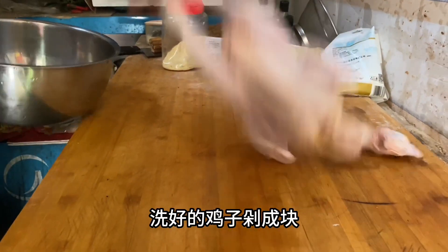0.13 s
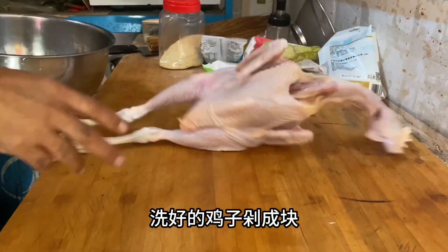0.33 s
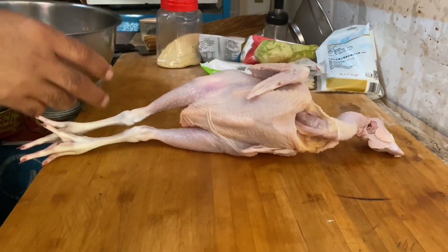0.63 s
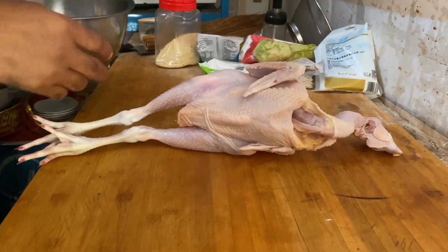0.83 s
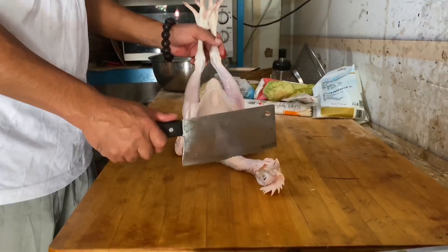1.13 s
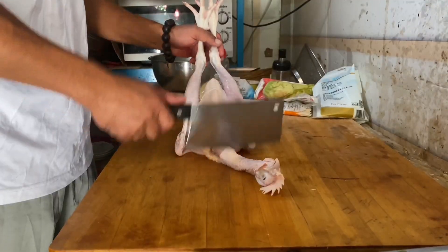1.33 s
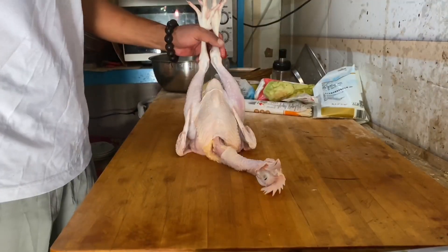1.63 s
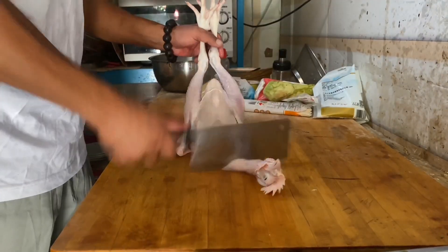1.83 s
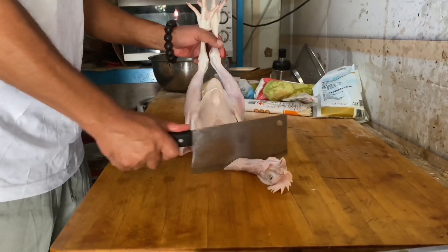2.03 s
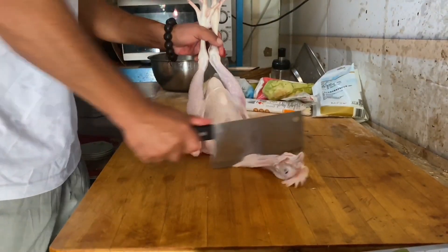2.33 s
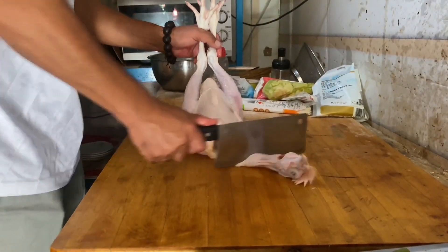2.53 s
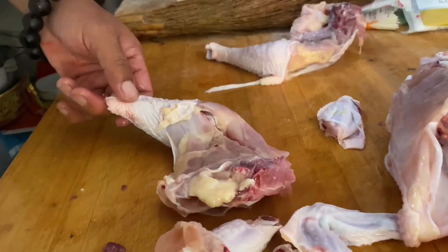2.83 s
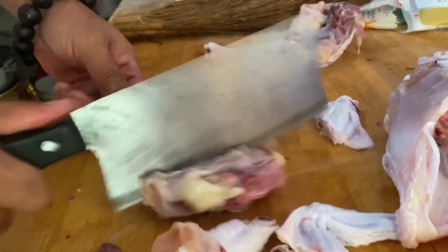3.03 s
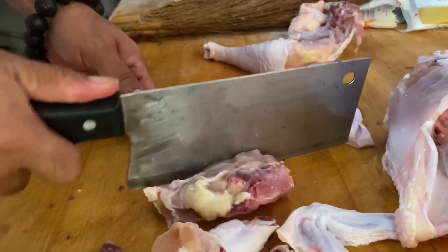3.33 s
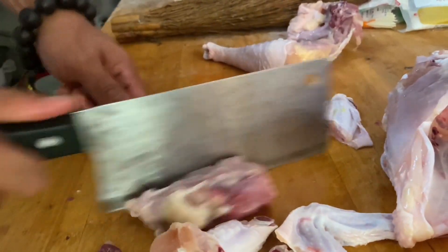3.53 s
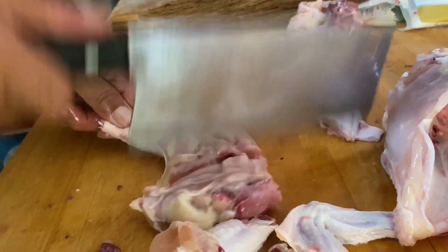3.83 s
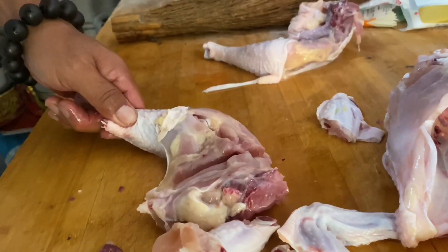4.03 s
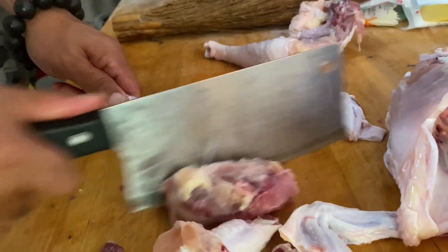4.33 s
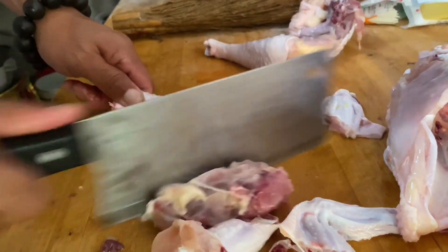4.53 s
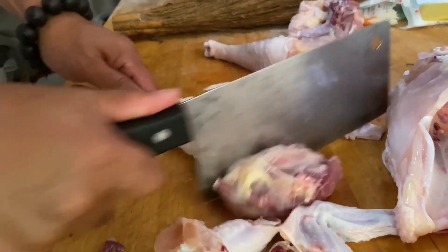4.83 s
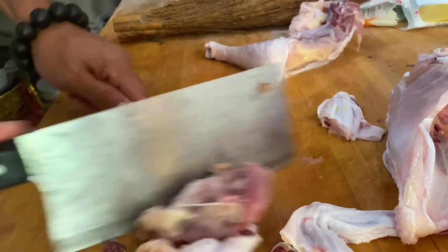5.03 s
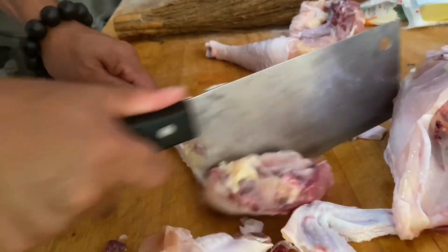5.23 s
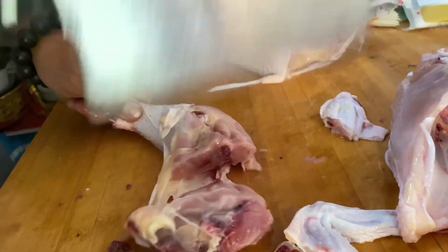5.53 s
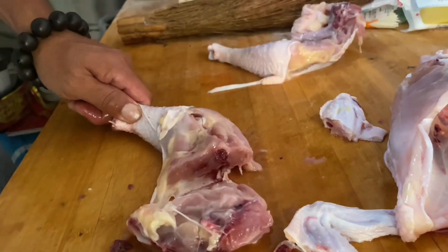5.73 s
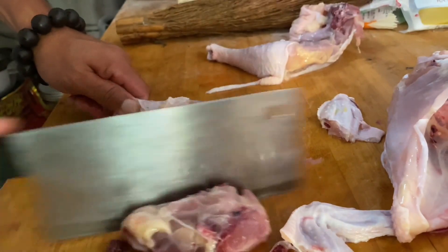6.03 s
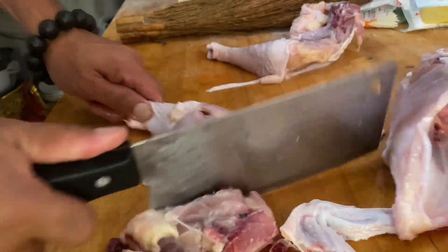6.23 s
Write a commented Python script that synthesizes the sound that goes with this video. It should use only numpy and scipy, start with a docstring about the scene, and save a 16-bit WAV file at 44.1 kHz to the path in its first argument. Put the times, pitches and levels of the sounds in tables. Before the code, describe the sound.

Close stereo pickup of butchering on a wooden board: a tumbling, fleshy landing with a short metallic bowl ring, then low kitchen hum. One hard chop with light steel rattle and a short echo, then bumps as the meat is pushed. The room noise suddenly cuts to near quiet, and three solid, crunchy chops follow at wide intervals, with tiny taps and scrapes between.

```python
"""Chopping a chicken on a board

A plucked chicken drops on a thick wooden board; a cleaver chops it and is dragged through the meat, amid light knocks.
Blows and bumps excite decaying modes of wood; bone, gristle and wet skin are shaped noise; steel rings and rattles.
A hard-walled kitchen adds a noise-tap echo, hum and hiss, and a steel bowl rings at the start.
At 2.612 s a loud kitchen background cuts to a quieter one, echo tail included.
Two microphone ports, the board nearer the left one."""
import sys
import numpy as np
from scipy import signal
from scipy.fft import rfft, irfft, next_fast_len
from scipy.io import wavfile
from scipy.ndimage import uniform_filter1d

SR = 44100
rng = np.random.default_rng(int(sys.argv[2]) if len(sys.argv) > 2 else 0)


def dump_mix(stems):
    """Bounce the given channels to the path in sys.argv[1] as a 16-bit WAV at rate SR."""
    frames = np.atleast_2d(stems).T  # one column per channel
    limited = np.clip(frames, -1, 1)  # hard clip at full scale
    pcm = np.round(limited * 32767).astype(np.int16)
    wavfile.write(sys.argv[1], SR, pcm)


N = 281313

# Levels are relative within each source.
# Board modes before damping: [mode_hz, level_db, t60_s]
BOARD_MODES = [(68.4, -7, 0.038), (96, -6, 0.079), (129.86, -12, 0.34), (167, -9.5, 0.14),
               (263, -4.5, 0.056), (361, -3.5, 0.037), (533, 0.5, 0.016), (623, 2.5, 0.086),
               (840, 13, 0.043), (919.5, 13.5, 0.033), (1052, -1.5, 0.23), (1290, 1, 0.024),
               (1730, -11.5, 0.0085), (2310, -18, 0.049)]
# Ringing steel of blade and pans: [mode_hz, level_db, t60_s]
BLADE_MODES = [(769, -10, 0.5), (910, -4, 0.3), (1013, -15.5, .6), (1270, -14.5, 0.18), (1530, -9.5, 0.3),
               (1685, -22, 0.45), (1972, -18, 0.27), (2204, -23, 0.52), (2490, -22, 0.19),
               (2824, -25.5, 0.13), (3110, -21, 0.28), (3200, -30.5, .3), (3670, -26.5, .3),
               (4230, -31.5, .25)]
# Spectrum of cracking bone, skin and steel: [freq_hz, level_db]
CRACK_SPECTRUM = [(250, -6), (1000, 15), (2000, -1), (3600, -3), (6200, -9), (8300, -20), (10300, -6.5),
                  (13000, -24.5), (16000, -26)]
# Parts of the carcass landing on the board:
# [start_s, strength_db, weight_db, table_db, crack_db, contact_ms, thud_db, thud_hz]
SLAPS = [(0.098, -9.5, -12.5, -15.5, -21, 0.59, -17, 807), (.101, -25, -25, -32, -34, 1.2, -13, 248),
         (.112, -12, -21, -22.5, -11, 0.52, -4.5, 267), (0.127, -15, 1.5, -5.5, -18.5, 1.8, -11.5, 164),
         (0.183, 4, -31, -8, -10.5, 0.5, -15, 553), (0.197, -31.5, -1, -25, -43, 1.2, -5, 251.4),
         (.349, -13, -8, -24.5, -37.5, 1.4, -17, 283)]
# Cleaver chops: [start_s, strength_db, weight_db, table_db, crack_db, blade_db, contact_ms, follow_ms, cut_ms,
# thud_db, thud_hz, thud_lag_ms, knock_db, knock_hz, pans_db]
CHOPS = [(1.780, -2.5, -11, -7.5, -6, -30, 0.31, 4.7, 9.4, -9.5, 400, .5, -8.5, 1146, -52.5),
         (2.9683, -0.5, -3, -6, -15.5, -25, 0.36, 2.9, 2.8, -7.5, 356, 1, -7, 788, -49),
         (4.048, 1, -2.5, -5, -13, -43, 0.3, 3.3, 5.6, -6.5, 348, 1.51, -13.5, 870, -62),
         (5.7438, 2, -19.5, -21.5, -14.5, -28.5, 0.48, 1.8, 5.5, -4, 366, 2.87, 4, 972, -47.5)]
# Light short knocks: [start_s, strength_db, weight_db, thud_db, thud_reference_hz]
TAPS = [(2.959, -18.5, -46, -28.5, 508), (3.703, -22.5, -33.5, -30, 540.5), (3.762, -52, -47.5, -52.5, 398),
        (4.621, -44, -44.5, -37.5, 412), (4.698, -37.5, -40, -42.5, 466), (5.377, -23.5, -34.5, -29, 524.6),
        (5.737, -12, -54, -26.5, 893), (6.216, -43, -39, -37.5, 458), (6.249, -24.5, -51.5, -50, 374.6),
        (6.353, -26, -23.5, -37, 960)]
# Softer repeats of each light knock: [delay_ms, level_db, share_of_thud_reference]
TAP_BOUNCES = [(11.9, -10, 0.54), (28.35, -13.5, 0.56)]
# Tiled wall behind the board: [delay_ms, level_db]
WALL_ECHOES = [(4.3, -4), (13.5, -11)]
# Pans and jars too many to tell apart: [freq_hz, density_db_per_hz]
CLATTER_SPECTRUM = [(300, -11.5), (800, 2), (1700, -4.5), (3200, -8), (5000, -14.5), (9000, -24.5)]
# Ticks of wet skin, gristle and steel: [start_s, level_db, pitch_hz, filter_q, t60_s]
TICKS = [(0.046, -32, 3720, 3.6, 0.2), (1.778, -23.5, 5520, 31, 0.036), (2.969, -20, 3970, 4.6, 0.0092),
         (4.053, -17, 2360, 4.3, 0.017), (4.672, -49.5, 3640, 4.5, 0.056), (5.751, -28, 1880, 1.2, 0.16),
         (6.338, -55, 4530, 9.1, 0.038), (6.356, -47.5, 3770, 7.5, 0.21), (.13, -25, 2560, 2.8, 0.052),
         (0.657, -47, 1800, 3.3, 0.042), (0.675, -41.5, 1650, 2.7, 0.1), (.28, -31.5, 3380, 7.6, 0.039),
         (0.311, -36, 4060, 7.1, 0.017), (2.326, -46.5, 1710, 3.6, 0.088), (2.191, -59.5, 4500, 5, 0.086),
         (2.365, -56, 3600, 8, .03), (2.387, -57.5, 3020, 4.2, 0.038), (3.76, -84, 4790, 180, 0.37),
         (3.76, -63.5, 5980, 1.1, 0.0097), (4.474, -60, 3400, 4.7, 0.078), (4.622, -59.5, 4020, 2, 0.13),
         (4.68, -54, 1930, 3.5, 0.096), (4.878, -56.5, 4180, 1.9, 0.015), (4.887, -58, 3970, 2.6, 0.017),
         (5.04, -52.5, 4150, 1.56, 0.017), (5.333, -50.5, 3740, 2.15, 0.022), (6.264, -43, 4060, 3.3, 0.12)]
# Meat and blade moving over the board: [peak_s, rise_s, fall_s, table_db, weight_db, scrape_db, hiss_db]
STROKES = [(0.014, 0.11, 0.28, -51.5, -34, -29.5, -40), (0.115, 0.018, 0.02, -18, -18.5, -17, -19),
           (0.149, 0.058, 0.087, -20.5, -17.5, -19.5, -27), (.19, 0.044, 0.14, -16, -23.5, -29.5, -36.5),
           (0.356, 0.018, 0.11, -21, -28.5, -53, -48), (0.668, 0.03, 0.081, -55, -59, -50, -51),
           (2.051, 0.24, 0.13, -46, -48.5, -46, -81), (2.119, 0.091, 0.048, -58, -67, -42.5, -58.5),
           (2.163, 0.059, 0.15, -32, -51, -48, -56), (2.319, 0.067, 0.1, -37.5, -47, -52.5, -72),
           (2.483, 0.32, 0.31, -46, -55.5, -58, -74), (3.54, 0.13, 0.023, -55, -58.5, -59.5, -70.5),
           (4.23, 0.05, 0.56, -54.5, -70, -64.5, -73.5), (4.419, 0.024, 0.063, -79, -51, -55, -70),
           (4.484, 0.06, 0.057, -69, -52, -56.5, -72), (4.667, 0.085, 0.054, -47, -69.5, -46.5, -58.5),
           (4.74, 0.12, 0.16, -53.5, -58.5, -75.5, -100), (4.89, 0.18, 0.063, -67.5, -72.5, -85, -75),
           (5.023, 0.06, 0.2, -57.5, -62.5, -63, -70), (5.199, 0.042, 0.05, -65, -56.5, -68, -69),
           (5.274, 0.15, 0.083, -59, -73.5, -70, -72), (5.858, 0.054, 0.96, -43.5, -49, -51.5, -77),
           (6.0, 0.07, 0.11, -55.5, -54, -51, -56.5), (6.226, 0.038, 0.27, -52, -52, -71, -70.5),
           (6.266, 0.0052, 0.044, -42, -48, -41.5, -45), (6.362, 0.028, 0.12, -32.5, -40, -39, -52.5)]
# Wet skin hiss: [freq_hz, density_db_per_hz]
WET_SPECTRUM = [(760, -49.5), (1300, 0), (1800, -4), (2600, -14), (3400, -4), (4580, -8), (8430, -18),
                (10400, -13), (13400, -24.5), (15300, -29), (16000, -79)]
# Carcass bumping the board as it is pushed: [start_s, level_db, pitch_hz, t60_s]
BUMPS = [(2.146, -22, 124, 0.11), (2.183, -29, 131, 0.16), (2.227, -33.5, 132, 0.15), (2.316, -38, 204, .1),
         (2.474, -42, 137.4, 0.091), (3.792, -54, 150, .05), (5.018, -47, 129.5, 0.1),
         (5.057, -46.5, 134.5, 0.32), (5.19, -47.5, 131.4, 0.34), (5.263, -52, 122, 0.18),
         (5.968, -50, 295, 0.087)]
# Pans on the shelves, before the closing fade: [mode_hz, level_db, t60_s]
PAN_MODES = [(750, -4, 1.9), (880, 0.5, .55), (1010, -4.5, 5), (1355, -12, .5), (1450, -10, 2),
             (1725, -5.5, 1.2), (2030, -9.5, 1), (2260, -13, .7), (2490, -12, .6), (2772, -16.5, .45),
             (3070, -11, 0.72), (3187, -10.5, 0.54)]
# Steel bowl: [mode_hz, level_db, t60_s]
BOWL_MODES = [(371, -14, .15), (560, -10, .06), (791, -8, .25), (894, -5, .07), (1020, 1, .06),
              (1580, -8, .06), (1690, -6, .06), (1960, -18, .2), (2100, -20, .15)]
# Table swaying after heavy blows and pushes: [peak_s, level_db, pitch_hz, rise_s, t60_s]
SWAYS = [(0.141, -8, 57.2, 0.037, 0.35), (1.798, -38.5, 75.5, 0.009, 0.24), (2.005, -46, 59.2, 0.11, 0.38),
         (2.198, -44, 75.7, 0.083, 0.23), (3.111, -35.5, 57.9, .13, 0.53), (4.155, -34, 60.5, 0.13, 0.25),
         (4.801, -57.5, 63.8, 0.073, 1.2), (5.269, -54.5, 72, 0.095, 0.44), (5.867, -31, 49.4, 0.14, 0.58),
         (6.287, -43.5, 66.6, 0.19, 0.84)]
# Kitchen air level: [time_s, level_db]
AIR_LEVEL = [(0, -39), (.8, -52.5), (2.608, -58), (2.616, -73.5), (6.38, -72)]
# Louder kitchen air, before the cut: [freq_hz, density_db_per_hz]
AIR_LOUD_SPECTRUM = [(59, -11.5), (100, 4), (169, 2), (317, -16), (367, -8), (513, -24.5), (867, -24),
                     (1290, -38.5), (1730, -38.5), (2690, -49.5), (3680, -38), (5720, -34.5), (7050, -42.5),
                     (8700, -58.5), (15000, -72)]
# Quieter kitchen air, after the cut: [freq_hz, density_db_per_hz]
AIR_QUIET_SPECTRUM = [(59, -15), (100, 8.5), (146, 2.5), (297, -14.5), (345, -11), (472, -16.5),
                      (570, -30.5), (797, -21.5), (1240, -36), (2320, -42.5), (4840, -39.5), (6090, -43),
                      (8500, -50), (15000, -55.5)]
# Room decay: [freq_hz, t60_s]
ROOM_DECAY = [(100, 1), (300, 0.75), (900, 0.37), (2000, 0.41), (4000, 0.33), (8000, 0.36), (14000, 0.02)]
# Left port over right port: [freq_hz, difference_db]
LEFT_OVER_RIGHT = [(60, -1), (200, -2.3), (400, -1), (750, 3), (1400, 1.5), (2600, 5), (5000, 9.5),
                   (9000, 0), (15000, -.5)]
# Part of diffuse sound that differs between the ports: [freq_hz, level_db]
PORTS_APART = [(60, -32.5), (300, -7), (700, 0.5)]
# Microphone colour: [freq_hz, level_db]
MICROPHONE_COLOUR = [(11500, 2), (13500, -10)]

CUT_S = 2.612  # loud background cuts to the quieter one
RIGHT_LAG_SAMPLES = 18
# the board bends, then the table shakes, after the wood is reached
BOARD_LAG_MS, TABLE_LAG_MS = 4.5, 7
# flesh or steel left on the wood stills its high modes
SLAP_DAMP_T60_S, CHOP_DAMP_T60_S, TAP_DAMP_T60_S = 0.35, 0.36, 0.036
# board sound carried to the walls
SLAP_WALLS_DB, CHOP_WALLS_DB, TAP_WALLS_DB = -1, 2.5, -3
SLAP_FOLLOW_MS, SLAP_SQUASH_MS = 5.7, 2.6  # squash: flesh gives before the wood takes the weight
TAP_CONTACT_MS, TAP_FOLLOW_MS, TAP_LEAD_MS = 1.25, 2, 0.28
TAP_TABLE_DB, TAP_CRACK_DB = -7, -32  # table relative to weight; crack relative to strength
TAP_FIRST_SHARE = 0.92  # of thud_reference_hz
SLAP_THUD_T60_S, CHOP_THUD_T60_S, TAP_THUD_T60_S, THUD_LAG_MS = .08, .03, .022, 1.3
CLATTER_DB, CLATTER_T60_S = -12, 0.56  # relative to the blade ring
WOBBLE_PER_S = 140
STROKE_ENDS_DB, STROKE_ROUND = -21, 1.1  # level one rise or fall from the peak; 1 = pointed, higher = flatter
SING_DB = -6  # steel ringing along while dragged
BUMP_CONTACT_MS = 3
PANS_RISE_S = .02
KNOCK_T60_S, KNOCK_RISE_MS = .035, 3
HUM_HZ, HUM_LOUD_DB, HUM_QUIET_DB = 69, -45, -72
SWAY_START_DB = -28  # one rise before the peak
EDGE_HZ = 16700


def blows():
    """Crunch through bone, snap on wood, then weight in the low modes; rows: left, right, towards the walls."""
    out = np.zeros((3, N))
    high, low, table = ring(BOARD_MODES, 400), ring(BOARD_MODES, 150, 400), ring(BOARD_MODES, 0, 150)
    high = high + sum(gain_of(db) * np.roll(high, round(ms * SR / 1000)) for ms, db in WALL_ECHOES)
    high, low, table = (x / abs(x).max() for x in (high, low, table))
    low = np.roll(low, round(BOARD_LAG_MS * SR / 1000))
    table = np.roll(table, round(TABLE_LAG_MS * SR / 1000))
    snap = coloured(1. * (np.arange(256) == 128), CRACK_SPECTRUM)
    snap /= abs(snap).max()
    for (s, strength_db, weight_db, table_db, crack_db, blade_db, contact_ms, follow_ms, cut_ms,
         thud_db, thud_hz, thud_t60_s, lag_ms, damp_t60_s, walls_db) in contacts():
        wood_s = cut_ms / 1000
        crunch = crack_noise(crack_db, wood_s)
        heavy = gain_of(weight_db) * low + gain_of(table_db) * table
        damping = gain_of(strength_db - 60 * np.arange(SR) / SR / damp_t60_s)
        body = damping * pushed(high, contact_ms)[:SR] + pushed(heavy, follow_ms)[:SR]
        thud = ring([(thud_hz, thud_db, thud_t60_s)])[:5292]
        add(body, lag_ms / 1000, pushed(thud, 0.75))
        for snap_db, body_db, port in zip((8, 8, 16), (0, 0, walls_db), out):
            add(port, s + wood_s - 128 / SR, gain_of(crack_db + snap_db) * snap)
            add(port, s + wood_s, gain_of(body_db) * body)
        add(out[0], s, crunch[0])
        add(out[1], s, 0.022 * crunch[0] + crunch[1])
        if blade_db is not None:  # thin steel is heard mostly off the walls
            steel = rattle(BLADE_MODES, steady=.35) + clatter()
            add(out[2], s + wood_s, gain_of(blade_db) * steel)
    return out


def crack_noise(crack_db, wood_s):
    """Splinter noise, different at each port, grows until the wood is reached and then dies fast."""
    t = np.arange(1323) / SR
    crunch = evened(coloured(rng.standard_normal((2, len(t))), CRACK_SPECTRUM))
    crunch *= gain_of(crack_db - 22 * np.maximum(1 - t / wood_s, 0))
    return crunch * gain_of(-60 * np.maximum(t - wood_s, 0) / .012)


def contacts():
    """Gathers slaps, chops and light knocks with their repeats as rows in the order that blows() unpacks."""
    rows = []
    for s, strength, weight, table, crack, contact, thud_db, thud_hz in SLAPS:
        rows.append((s, strength, weight, table, crack, None, contact, SLAP_FOLLOW_MS, SLAP_SQUASH_MS,
                     thud_db, thud_hz, SLAP_THUD_T60_S, THUD_LAG_MS, SLAP_DAMP_T60_S, SLAP_WALLS_DB))
    for *row, lag_ms, _, _, _ in CHOPS:
        rows.append((*row, CHOP_THUD_T60_S, lag_ms, CHOP_DAMP_T60_S, CHOP_WALLS_DB))
    for s, strength, weight, thud_db, thud_hz in TAPS:
        for delay_ms, less_db, share in [(0, 0, TAP_FIRST_SHARE)] + list(TAP_BOUNCES):
            hit_db, press_db = strength + less_db, weight + less_db
            rows.append((s + delay_ms / 1000, hit_db, press_db, press_db + TAP_TABLE_DB, hit_db + TAP_CRACK_DB,
                         None, TAP_CONTACT_MS, TAP_FOLLOW_MS, TAP_LEAD_MS, thud_db + less_db, thud_hz * share,
                         TAP_THUD_T60_S, THUD_LAG_MS, TAP_DAMP_T60_S, TAP_WALLS_DB))
    return rows


def rattle(modes, steady):
    """Loose steel: each mode wanders in strength and phase while it dies, which blurs its line."""
    hz, db, t60 = np.transpose(modes)[:, :, None]
    t, knots_s = np.arange(SR * 3 // 4) / SR, np.arange(120) / WOBBLE_PER_S
    walks = rng.standard_normal((2, len(modes), len(knots_s)))
    a, b = (np.array([np.interp(t, knots_s, row) for row in part]) for part in walks)
    phase = 2 * np.pi * hz * t
    return (gain_of(db - 60 * t / t60) * ((steady + a) * np.sin(phase) + b * np.cos(phase))).sum(0)


def clatter():
    """The shelves answer a chop with a dense dying rattle of shaped noise."""
    t = np.arange(SR * 3 // 4) / SR
    noise = evened(coloured(rng.standard_normal(len(t)), CLATTER_SPECTRUM))
    return gain_of(CLATTER_DB - 60 * t / CLATTER_T60_S) * noise


def ticks():
    """Each tick is a decaying puff of noise, resonant around its pitch."""
    out, t = np.zeros(N), np.arange(6000) / SR
    for s, db, hz, q, t60 in TICKS:
        peak = signal.iirpeak(hz, q, SR)
        puff = signal.lfilter(*peak, signal.lfilter(*peak, rng.standard_normal(len(t))))
        add(out, s, gain_of(db - 60 * t / t60) * evened(puff))
    return out


def rubs():
    """Stick-slip grains drive the table and the low and middle board modes; wet skin hisses above them."""
    t, power = np.arange(N) / SR, np.zeros((4, N))
    for s, rise, fall, *dbs in STROKES:
        end_s = min(s + 2 * fall, CUT_S if s < CUT_S else N)
        near = slice(max(round((s - 2 * rise) * SR), 0), round(end_s * SR))
        off = abs(t[near] - s) / np.where(t[near] < s, rise, fall)
        power[:, near] += gain_of(np.array(dbs)[:, None] + STROKE_ENDS_DB * off ** STROKE_ROUND) ** 2
    bursts_db = np.minimum(rng.exponential(1, (4, N)), 5) * [[3.5], [3.5], [3.1], [2.5]]
    slips = rng.standard_normal((4, N)) * gain_of(bursts_db)
    # wet skin grips and lets go in clumps
    slips[2:] *= gain_of(1.6 * evened(uniform_filter1d(rng.standard_normal(N), 220)))
    bands_hz = [(80, 200), (200, 400), (400, 1500)]
    wood = [signal.oaconvolve(slip, ring(BOARD_MODES, *band))[:N] for slip, band in zip(slips, bands_hz)]
    singing = evened(signal.oaconvolve(slips[2], ring(BLADE_MODES))[:N])
    wood[2] = evened(wood[2]) + gain_of(SING_DB) * singing
    return sum(np.sqrt(p) * evened(x) for p, x in zip(power, wood + [squelch(slips[3])]))


def squelch(grains):
    """Wet skin: patches a few hundred Hz wide swell and close on their own."""
    z = signal.stft(coloured(grains, WET_SPECTRUM), nperseg=128)[2]
    patches = uniform_filter1d(rng.standard_normal(z.shape), 3, axis=0)
    patches = evened(uniform_filter1d(patches, 8, axis=1))
    return signal.istft(z * gain_of(4.1 * patches), nperseg=128)[1][:N]


def bumps():
    """Each bump is one soft low ring of the board."""
    out = np.zeros(N)
    for s, db, hz, t60 in BUMPS:
        add(out, s, pushed(ring([(hz, db, t60)]), BUMP_CONTACT_MS))
    return out


def pans():
    """Clear thin lines swell in after each chop; a short bone knock rings up as the edge bites."""
    out, t = np.zeros(N), np.arange(SR) / SR
    lines = ring(PAN_MODES) * np.minimum(t / PANS_RISE_S, 1) * np.hanning(2 * SR)[SR:]
    for s, *_, cut_ms, thud_db, thud_hz, lag_ms, knock_db, knock_hz, pans_db in CHOPS:
        add(out, s + cut_ms / 1000, gain_of(pans_db) * lines)
        knock = ring([(knock_hz, knock_db, KNOCK_T60_S)]) * np.minimum(t * 1000 / KNOCK_RISE_MS, 1)
        add(out, s + (cut_ms - KNOCK_RISE_MS) / 1000, knock)
    return out


def bowl():
    """Decaying modes of a steel bowl."""
    return gain_of(-17.5) * ring(BOWL_MODES)


def hum():
    """Narrow low noise: a hum, softer from the cut on, and a low swell each time the table sways."""
    t = np.arange(N) / SR
    lowpass = signal.butter(4, 9, fs=SR, output="sos")
    slow = signal.sosfilt(lowpass, rng.standard_normal(N) + 1j * rng.standard_normal(N))
    slow /= abs(slow) ** .5 + 1e-9  # steadier than plain noise
    slow /= np.sqrt(np.mean(abs(slow) ** 2) / 2)
    level_db = np.interp(t, [CUT_S - .004, CUT_S + .004], [HUM_LOUD_DB, HUM_QUIET_DB])
    tones = gain_of(level_db) * np.exp(2j * np.pi * HUM_HZ * t)
    for s, db, hz, rise, t60 in SWAYS:
        near = slice(max(round((s - 2 * rise) * SR), 0), round((s + t60) * SR))
        late = t[near] - s
        swell_db = np.where(late < 0, -SWAY_START_DB * late / rise, -60 * late / t60)
        tones[near] += gain_of(db + swell_db) * np.exp(2j * np.pi * hz * late)
    return (slow * tones).real


def air():
    """Diffuse kitchen noise; level and colour switch at the cut."""
    noise = diffuse(rng.standard_normal((3, N)), 0.21)
    t = np.arange(N) / SR
    loud, quiet = evened(coloured(noise, AIR_LOUD_SPECTRUM)), evened(coloured(noise, AIR_QUIET_SPECTRUM))
    return np.where(t < CUT_S, loud, quiet) * gain_of(np.interp(t, *np.transpose(AIR_LEVEL)))


def room(x):
    """Sparse taps of random sign and size, one in every 6 samples, each band dying at its own speed."""
    taps = np.zeros((3, SR))
    at = np.arange(300, SR - 6, 6)  # first wall 7 ms away
    at = at + rng.integers(0, 6, (3, len(at)))
    np.put_along_axis(taps, at, rng.standard_normal(at.shape), 1)
    hz, t, z = signal.stft(diffuse(taps, 0.15), SR, nperseg=256)
    t60 = read(ROOM_DECAY, hz)[:, None]
    decay = gain_of(-60 * t / (0.45 * t60)) + gain_of(-18.0 - 60 * t / t60)  # near walls first
    tail = signal.istft(z * decay, SR, nperseg=256)[1]
    return signal.fftconvolve(x[None], tail / np.linalg.norm(tail[0]), axes=1)[:, :N]


def diffuse(three, shared):
    """One part reaches both ports, the right one later; two more differ per port, less in the bass."""
    common = np.array([three[0], np.roll(three[0], RIGHT_LAG_SAMPLES)])
    return shared * common + coloured(three[1:], PORTS_APART)


def ring(modes, lo_hz=0, hi_hz=SR):
    """Impulse response of the modes inside a band."""
    t = np.arange(SR) / SR
    return sum(gain_of(db - 60 * t / t60) * np.sin(2 * np.pi * hz * t)
               for hz, db, t60 in modes if lo_hz <= hz < hi_hz)


def pushed(body, contact_ms):
    """A smooth push of about the given length excites the body."""
    push = signal.windows.hann(max(round(contact_ms * SR / 1000), 1) + 2)
    return signal.oaconvolve(body, push / push.sum())


def gain_of(db):
    """Decibels to a factor."""
    return 10 ** (np.asarray(db) / 20)


def evened(x):
    """Scales to rms 1."""
    return x / np.sqrt(np.mean(x ** 2) + 1e-20)


def read(points, hz):
    """Reads a spectrum table on a log frequency axis."""
    f, value = np.transpose(points)
    return np.interp(np.log(hz + 1), np.log(f + 1), value)


def coloured(x, points, share=1):
    """Filters by a spectrum table, its dB scaled by share."""
    size = next_fast_len(x.shape[-1] + 2048)
    gain = gain_of(share * read(points, np.fft.rfftfreq(size, 1 / SR)))
    return irfft(rfft(x, size) * gain, size)[..., :x.shape[-1]]


def add(mix, s, sound):
    """Mixes a sound in at second s."""
    part = mix[max(round(s * SR), 0):][:len(sound)]
    part += sound[:len(part)]


def scene():
    """Near sounds reach the left port first; the room follows, its earlier tail stopping dead at the cut."""
    hits, near = blows() + ticks(), rubs() + bumps()
    before = np.arange(N) / SR < CUT_S
    left, right = hits[:2] + near + pans()
    far = hits[2] + gain_of(3.5) * near
    echo = before * room(before * far) + room(~before * far)
    ports = np.array([left, np.roll(right, RIGHT_LAG_SAMPLES)]) + gain_of(-10.0) * echo
    ports = np.array([coloured(ports[0], LEFT_OVER_RIGHT, .5), coloured(ports[1], LEFT_OVER_RIGHT, -.5)])
    add(ports.T, 0, bowl()[:, None])  # equally far from both ports
    return ports + air() + hum()


def record(dry):
    """Microphone colour; gain control ducks loud sound, peaks round off; then the band limit."""
    highpass = signal.butter(4, 46, "highpass", fs=SR, output="sos")
    dry = signal.sosfilt(highpass, coloured(dry, MICROPHONE_COLOUR))
    power_db = 10 * np.log10(abs(uniform_filter1d((dry ** 2).mean(0), 300)) + 1e-12)
    fall_db = np.arange(N) * 32.2 / SR  # held level falls 32.2 dB a second
    held_db = np.maximum.accumulate(power_db + fall_db) - fall_db
    over_db = np.maximum(held_db + 33.5, 0)
    ducked = dry / gain_of(0.27 * uniform_filter1d(over_db, 800, origin=399))  # acts some ms late
    band_limit = signal.firwin(511, EDGE_HZ, window=("kaiser", 9), fs=SR)
    return signal.oaconvolve(np.tanh(ducked), band_limit[None], "same")


dry = scene()
out = record(dry)
dump_mix(out)
```